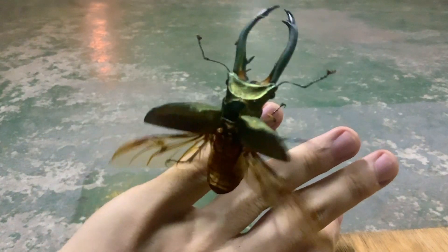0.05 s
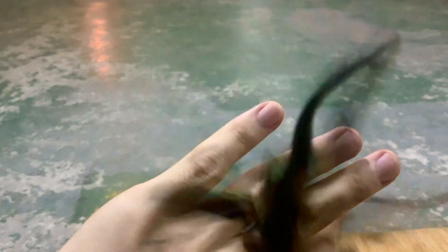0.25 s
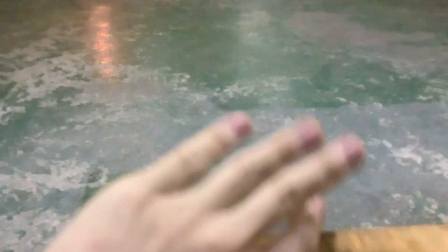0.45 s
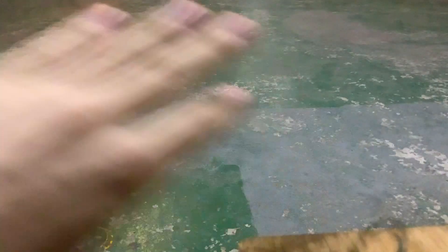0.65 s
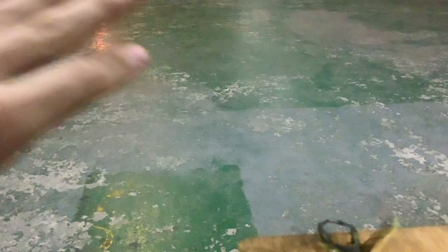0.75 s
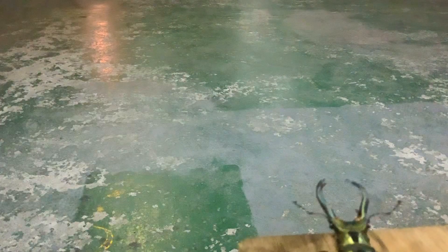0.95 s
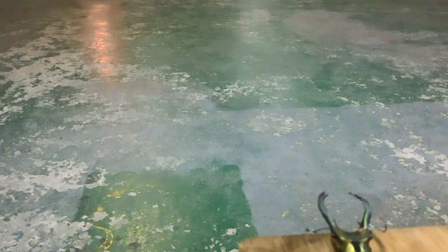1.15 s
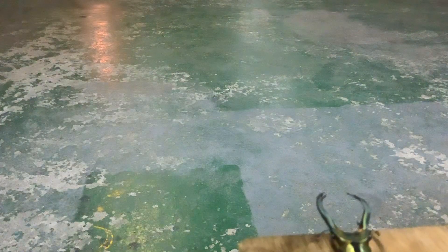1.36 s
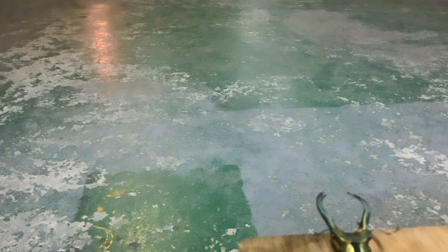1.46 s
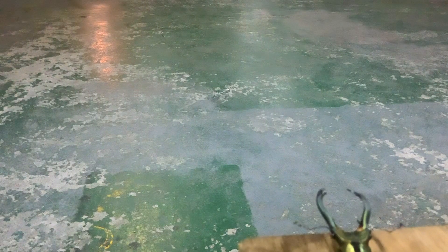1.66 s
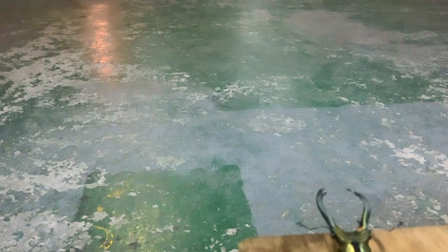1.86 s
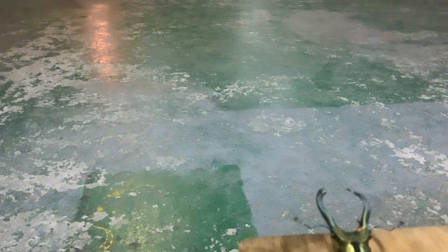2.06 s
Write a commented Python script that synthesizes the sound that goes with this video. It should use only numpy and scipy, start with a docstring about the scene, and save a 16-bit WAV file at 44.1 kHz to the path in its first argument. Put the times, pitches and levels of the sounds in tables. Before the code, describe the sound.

Close stereo capture of a big beetle taking off: about thirty-five crisp wing claps a second over a low throb, a clawed landing knock on wood, small ticks and drags, faint cricket and low rumble, slight room echo.

```python
"""Beetle take-off and landing

A large beetle takes off from a hand close by, flies a short arc and lands with a scrabble and a knock on wood.
Each wingbeat is a low pulse of harmonics, puffs of membrane noise and a click burst that rings the wing case.
Grainy noise bursts make the claws and ring the wood; afterwards they tick and drag.
A wavering sine chirps as the near cricket; narrow noise bands make the far insects and a low rumble."""
import sys
import numpy as np
from scipy import signal
from scipy.fft import rfft, irfft
from scipy.io import wavfile

SR = 44100
rng = np.random.default_rng(int(sys.argv[2]) if len(sys.argv) > 2 else 0)


def persist_wave(psi):
    """Save psi, clipped to +-1, as 16-bit WAV."""
    counts = np.round(np.clip(psi, -1, 1) * 32767).astype(np.int16)
    wavfile.write(sys.argv[1], SR, np.atleast_2d(counts).T)


N = 92610

# Wing edge claps on the wing case, one a beat: t/s, level/dB, rebound against it/dB
CLAPS = [(0.0928, -41.5, -10.5), (0.1164, -22.5, -20), (0.1428, -14.5, -17), (0.1693, -17, -16),
         (0.1974, -15, -3), (0.2255, -15.5, -18), (0.2535, -22, -3), (0.2831, -24, -10.5),
         (0.3106, -19.5, -7), (0.339, -13, -8.5), (0.367, -13.5, -20), (0.395, -15, -9),
         (0.4231, -14.5, -24.5), (0.4518, -14.5, -22), (0.4797, -17, -9), (0.5091, -18, -13.5),
         (0.5368, -20.5, -12), (0.565, -15.5, -16), (0.5926, -16.5, -12.5), (0.621, -17, -12),
         (0.6495, -17, -12), (0.679, -20.5, -7)]
# Air pulse levels over the flight: t/s, second harmonic/dB, harmonics 1 and 3-5/dB, higher harmonics/dB
PUSH = [(0.09, -58.5, -67.5, -56.5), (0.122, -39.5, -43, -47), (0.216, -31, -44, -46.5),
        (0.345, -26, -23.5, -37.5), (0.41, -24, -22.5, -37), (0.45, -26, -25.5, -43),
        (0.532, -21, -30, -45), (0.68, -38, -48.5, -48), (0.728, -44, -57, -52), (0.77, -55, -60.5, -64.5)]
UPSTROKE_AT = 0.3112   # share of the beat after the clap


def from_db(db):
    """Gain of a level in dB."""
    return 10 ** (np.asarray(db) / 20)


def rms_one(x):
    """Scale to rms 1."""
    return x / np.sqrt(np.mean(x ** 2) + 1e-20)


def in_time(rows):
    """Level columns in dB, interpolated per sample; -120 dB outside their times."""
    s, *columns = np.transpose(rows)
    t = np.arange(N) / SR
    return [np.interp(t, s, column, left=-120, right=-120) for column in columns]


def at_hz(points, hz):
    """Table value on a log-frequency axis."""
    points_hz, values = np.transpose(points)
    return np.interp(np.log(hz + 1), np.log(points_hz), values)


def colour(x, points):
    """Shape by a spectrum in dB."""
    gain = from_db(at_hz(points, np.fft.rfftfreq(N, 1 / SR)))
    return irfft(rfft(x) * gain, N)


def drift(rate_hz):
    """Slow random wander with rms 1: noise through two equal one-pole lowpasses."""
    r = np.exp(-2 * np.pi * rate_hz / SR)
    noise = rng.standard_normal(N + SR)
    return rms_one(signal.lfilter([1], [1, -2 * r, r * r], noise)[SR:])   # first second lets it settle


def resonance(x, hz, width_hz):
    """Two-pole resonance with a gain of about 1 at its peak."""
    r = np.exp(-np.pi * width_hz / SR)
    zeros = np.array([1, 0, -1]) * (1 - r * r) / 2
    poles = [1, -2 * r * np.cos(2 * np.pi * hz / SR), r * r]
    return signal.lfilter(zeros, poles, x + 1e-18)


def bursts(s, db, decay_s):
    """Envelope that jumps at each time and dies away exponentially."""
    since = np.arange(N) / SR - np.reshape(s, (-1, 1))
    decay = np.exp(-np.abs(since) / np.reshape(decay_s, (-1, 1)))
    return (from_db(np.reshape(db, (-1, 1))) * (since >= 0) * decay).sum(axis=0)


def ports(x):
    """The two microphone ports hear the same sound with a phase difference by frequency."""
    # Phase between the ports: f/Hz, lead of the left/rad
    port_phase = [(30, -0.5), (200, 0.92), (600, -1.9), (1250, 1), (2000, -1.69), (3100, -3), (4200, -6),
                  (16000, -5.5)]
    turn = np.exp(.5j * at_hz(port_phase, np.fft.rfftfreq(N, 1 / SR)))
    return irfft(rfft(x) * [turn, 1 / turn], N)


def floor():
    """Stereo background noise, more or less alike in the two ports by frequency."""
    # Background spectrum: f/Hz, relative level/dB
    floor_colour = [(47, -30), (80, -1), (125, -9.5), (217, -13), (601, -27.5), (702, -26), (1530, -30),
                    (1860, -31), (2900, -46), (4520, -40.5), (6170, -50), (16000, -64)]
    # Left-right likeness: f/Hz, correlation (0 to 1)
    likeness = [(60, 0.99), (180, 0.97), (550, 0.1585), (1650, 0.18), (4970, 0.46), (15000, 0.67)]
    hz = np.fft.rfftfreq(N, 1 / SR)
    spectrum_db = at_hz([(40, -32.0)] + list(floor_colour), hz)
    mid, side = rfft(rng.standard_normal((2, N))) * from_db(spectrum_db)
    alike = at_hz(likeness, hz)
    both = np.sqrt(1 + alike) * mid + np.sqrt(1 - alike) * side * [[1], [-1]]
    return from_db(-56.5) * rms_one(irfft(both, N))


def rumble():
    """A low hum that wavers: noise passed twice through one narrow resonance."""
    hz, width_hz = 64.5, 19.8   # width of each pass
    noise = rng.standard_normal(N)
    return from_db(-53) * rms_one(resonance(resonance(noise, hz, width_hz), hz, width_hz))


def insects():
    """A near cricket, a gated sine on a slightly wandering pitch, and far noise bands that swell."""
    # Near cricket's chirps: start/s, length/s, level/dB
    chirps = [(0.452, 0.053, -57.5), (0.55, 0.084, -60.5), (0.646, 0.058, -59.5), (.735, .04, -58),
              (0.786, 0.034, -75), (0.86, 0.075, -64.5), (0.953, 0.071, -62), (1.052, 0.031, -54),
              (1.102, 0.036, -53.5), (1.151, 0.074, -62.5), (1.247, 0.027, -72.5), (1.295, 0.038, -71),
              (1.359, 0.13, -83)]
    # Far insects: f/Hz, width of each filter pass/Hz, level/dB, swell centre/s, swell width/s
    chorus = [(3594, 230, -78.5, 1.7, 2), (5986, 230, -70, 0.93, .2), (4830, 399, -88.5, 1.894, .5)]
    edge_s, flutter_db = 0.013, 2.5
    cricket_hz, wander_hz = 4468, 8
    t = np.arange(N) / SR

    gate = sum(from_db(db) * (np.tanh((t - s) / edge_s) - np.tanh((t - s - length) / edge_s)) / 2
               for s, length, db in chirps)
    pitch_hz = cricket_hz + wander_hz * drift(21)
    song = np.sqrt(2) * np.sin(2 * np.pi * np.cumsum(pitch_hz) / SR)
    near = gate * from_db(flutter_db * drift(25)) * song

    noise = rng.standard_normal((2, N))
    far = 0
    for hz, width_hz, db, centre_s, swell_s in chorus:
        band = rms_one(resonance(resonance(noise, hz, width_hz), hz, width_hz))
        far = far + from_db(db) * np.exp(-.5 * ((t - centre_s) / swell_s) ** 2) * band
    return near * from_db([[-1.5], [.1]]) + far


def beats():
    """Wingbeats counted from clap to clap, running on for five beats at the last pace."""
    s = np.array(CLAPS)[:, 0]
    before = 2 * s[0] - s[1]
    after = s[-1] + (s[-1] - s[-2]) * np.arange(1, 6)
    s = np.r_[before, s, after]
    return np.interp(np.arange(N) / SR, s, np.arange(len(s)))


def air_pulse(beat):
    """Harmonics that line up at the downstroke and, weaker, at the upstroke; the high ones unsteadier."""
    # Harmonics of the beat: multiple, level column of PUSH (0 to 2), offset from that column/dB
    orders = [(1, 1, -14), (2, 0, 2.5), (3, 1, 2), (4, 1, 1), (5, 1, -9), (6, 2, -5.5), (7, 2, -6),
              (8, 2, -10), (9, 2, -14), (10, 2, -9), (12, 2, -12), (14, 2, -14.5)]
    downstroke_at = .58   # share of the beat after the clap
    wobble_db, wobble_hz = 4.5, 23.4
    levels = in_time(PUSH)
    out = 0
    for k, column, db in orders:
        wobble = wobble_db * drift(wobble_hz) * (1 if k > 4 else 0.25)
        upstroke_share = 0.65 if k > 5 else 0.25
        down = np.cos(2 * np.pi * k * (beat - downstroke_at))
        up = np.cos(2 * np.pi * k * (beat - UPSTROKE_AT))
        out = out + from_db(levels[int(column)] + db + wobble) * np.sqrt(2) * (down + upstroke_share * up)
    return out


def wash(beat):
    """Stirred air: partly shared low noise at each port, in a gust at every upstroke."""
    gust = 0.36 + np.exp(-.5 * ((beat % 1 - UPSTROKE_AT) / 0.13) ** 2)   # width as share of the beat
    shared, *own = rng.standard_normal((3, N))
    air = rms_one(resonance(shared + 1.1 * np.array(own), 280, 300.8))
    return from_db(in_time(PUSH)[2] - 2.5) * gust * air


def rustle(beat):
    """Membrane noise in puffs at fixed points of the stroke, each with its own chance strength."""
    # Membranes over the flight: t/s, level/dB
    rustle_level = [(0.09, -54), (0.1, -51), (0.2, -48), (0.7, -50.5)]
    # Puffs in each beat: place (share of the beat), width (share of the beat), level/dB
    puffs = [(.07, 0.05, -3.5), (.3, 0.07, 3.5), (.5, 0.083, -27), (.77, 0.065, 9.5)]
    # Membrane spectrum: f/Hz, relative level per Hz/dB
    membrane_colour = [(400, -2.5), (800, -3), (1500, 1.5), (2800, 2.5), (4000, -3), (7000, -8.5),
                       (11000, -11), (16000, -13.5)]
    scatter_db, wide = 4, 0.41   # wide: share that differs between the ports
    level_db, = in_time(rustle_level)

    chance = np.clip(rng.standard_normal((40, len(puffs))), -2, 1.5)[beat.astype(int)]
    gate = sum(from_db(db + scatter_db * chance[:, k]) * np.exp(-.5 * ((beat % 1 - at) / width) ** 2)
               for k, (at, width, db) in enumerate(puffs))

    crackly = rng.standard_normal((2, N)) * from_db(4.1 * drift(470))
    mid, side = rms_one(colour(crackly, membrane_colour))
    side = signal.sosfilt(signal.butter(2, 3000, "low", fs=SR, output="sos"), side)
    return from_db(level_db + 2) * gate * (ports(mid) + wide * side * [[1], [-1]])


def claps():
    """A short rattle of clicks and its rebound ring the wing case, with a broad treble crack."""
    # Wing case resonances: f/Hz, width/Hz, relative level/dB
    wing_case = [(6420, 1190, -11), (9250, 1100, -3), (11910, 474, 2.5), (14970, 897, -9.5)]
    # The rebound comes sooner once airborne: t/s, lag/s
    rebound_lag = [(.26, .0045), (.33, .0025)]
    s, db, rebound_db = np.transpose(CLAPS)
    scatter_s = .0004 * np.clip(rng.standard_normal(len(s)), -1.5, 1.5)
    later = s + np.interp(s, *np.transpose(rebound_lag)) + scatter_s

    # the crack sounds 1.1 ms after the beat mark and dies with a 0.57 ms time constant
    envelope = bursts(np.r_[s, later] + 0.0011, np.r_[db, db + rebound_db] - 3.5, 0.00057)
    crack = rng.choice([-1, 1], N) * envelope
    rings = sum((-1) ** k * from_db(d + 10.5) * resonance(crack, hz, width_hz)
                for k, (hz, width_hz, d) in enumerate(wing_case))
    treble = signal.sosfilt(signal.butter(2, 3000, "high", fs=SR, output="sos"), crack)
    return rings + from_db(-11) * treble


def claws():
    """Each touch is a dying burst of grainy noise, bright in itself, that also rings the wood."""
    # Touches, all three: t/s, level/dB, wood's ring against it/dB, treble against it/dB, decay time/s
    landing = [(0.6791, -26.5, -21.5, 1, 0.0044), (0.6862, -23, -16, -1.5, 0.0046),
               (0.693, -26, -10.5, -0.5, 0.0024), (0.7047, -16, -21.5, 0, 0.0022),
               (0.7082, -25, -16, -5, 0.0038), (0.7232, -29.5, -8, -5, 0.0043),
               (0.7267, -4, -14, 7, .00025), (0.7275, -17, -4, -2, .0012), (0.7322, -26, -7.5, 6, 0.0021),
               (0.7365, -32.5, -2.5, 3, 0.0032), (0.7485, -35, -1, 0, .006)]   # body and claws strike the wood
    steps = [(0.8176, -37.5, -20, 4, 0.0011), (0.8258, -34.5, -22, 4, 0.00085),
             (0.8443, -35.5, -40, 3.5, 0.0012), (0.8734, -45, -20, 1, .002),
             (0.9231, -49.5, -6, -12, 0.0022), (0.9333, -46, -4, -14, 0.0017),
             (0.9388, -30.5, -25, -9, 0.0013), (0.9617, -43, -15, -5, 0.00096),
             (1.618, -49.5, -18, 1.5, 0.0016), (1.8206, -40, -21, 0, .0018), (1.8357, -45, -11, -6, .0015),
             (1.8431, -44, -30, -0.5, 0.0018), (1.8592, -52.5, -21, -3, .003),
             (1.877, -54, -19, -5, 0.0032)]       # claws tick on the wood
    scuffs = [(0.81, -56, -13, 1.5, 0.077), (0.934, -52.5, -18, -11, 0.042), (1.08, -66, -25, -2, .04),
              (1.621, -71, -25, 3, 0.027), (1.83, -56, -22, -8, .06)]     # legs drag over the wood, soft scratches
    # Wood modes: f/Hz, relative level/dB, t60/s
    wood_modes = [(577, 1.5, 0.017), (914, -3.5, 0.01194), (1300, 1.8, 0.0097), (1620, 0.5, 0.015),
                  (1935, -5.5, 0.0052)]
    # Claw spectrum: f/Hz, relative level per Hz/dB
    claw_colour = [(1180, -32), (2000, -5.5), (2850, -5), (3610, -4.5), (11900, -10), (15400, -11.5),
                   (16500, -27)]
    grains_per_s, rise_s = 9000, .0003
    claw_db, drive_db = -5, 5
    s, db, wood_db, treble_db, length_s = np.transpose(landing + steps + scuffs)
    r = np.exp(-1 / (rise_s * SR))

    def touch(level_db):
        """Envelope of all touches with a softened onset."""
        return signal.lfilter([1 - r], [1, -r], bursts(s, db + level_db, length_s))

    clicks = (rng.random(N) < grains_per_s / SR) * np.minimum(rng.exponential(1, N), 2)
    grains = rng.standard_normal(N) * (0.5 + clicks)
    bright = rms_one(colour(grains, claw_colour))
    dull = signal.sosfiltfilt(signal.butter(2, 8000, "low", fs=SR, output="sos"), bright)

    push = rms_one(grains) * touch(wood_db + drive_db)
    wood = sum((-1) ** k * from_db(d + 13.0) * resonance(push, hz, np.log(1000) / np.pi / t60)
               for k, (hz, d, t60) in enumerate(wood_modes))
    return dull * touch(claw_db) + (bright - dull) * touch(claw_db + treble_db) + wood


def room(x):
    """A diffuse dying noise tail, different on each side."""
    t60_s, wall_cut_hz = 0.46, 8100
    t = np.arange(SR) / SR
    tail = rng.standard_normal((2, SR)) * from_db(-60 * t / t60_s) * (t > .004)
    tail = signal.sosfilt(signal.butter(1, [500, wall_cut_hz], "band", fs=SR, output="sos"), tail)
    return signal.fftconvolve(x[None], tail / np.sqrt(np.sum(tail[0] ** 2)))[:, :N]


def scene():
    """Background and insects, the beetle's wings and feet, and their echo."""
    background = floor() + rumble() + insects()
    beat = beats()
    low = ports(air_pulse(beat)) * from_db([[.7], [-.7]]) + wash(beat)
    membranes = rustle(beat)
    wings, feet = claps(), claws()
    hard = ports(wings + feet) * from_db([[-.3], [.3]])
    echo = room(from_db(-24) * wings + from_db(-20) * feet)
    return background + low + membranes + hard + echo


def record(dry):
    """The microphone's dip in the presence range; the deepest bass and the top are cut."""
    dry = dry - .6 * resonance(dry, 2800, 265)   # dip centre and width in Hz
    dry = signal.sosfilt(signal.butter(2, 39, "high", fs=SR, output="sos"), dry)
    return signal.sosfilt(signal.cheby2(12, 70, 17050, fs=SR, output="sos"), dry)


dry = scene()
out = record(dry)
persist_wave(out)
```